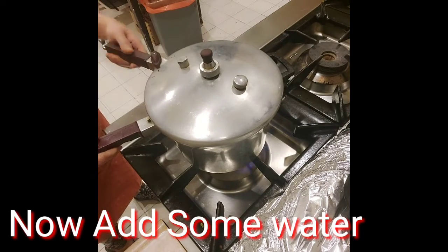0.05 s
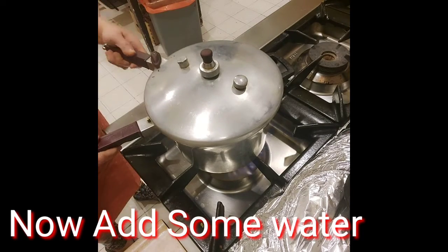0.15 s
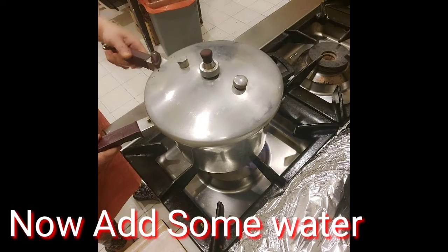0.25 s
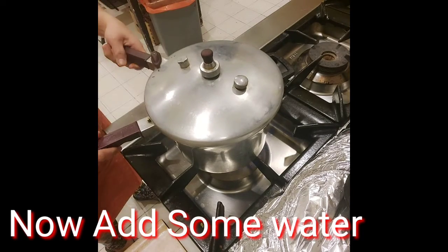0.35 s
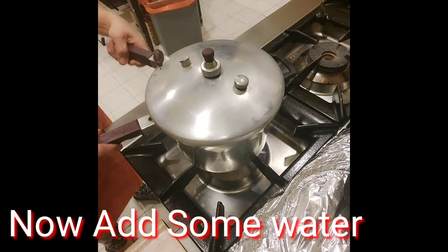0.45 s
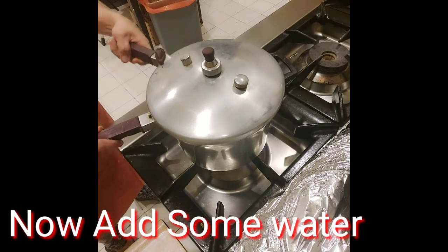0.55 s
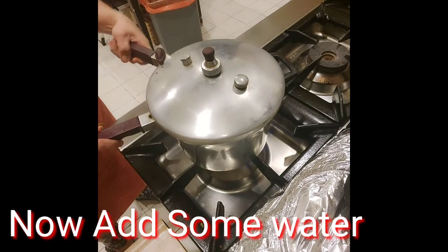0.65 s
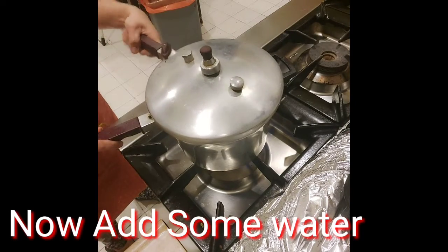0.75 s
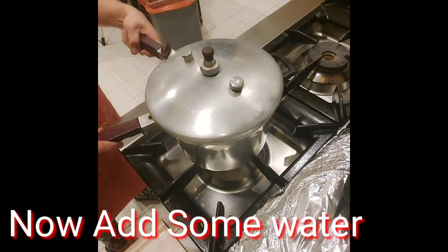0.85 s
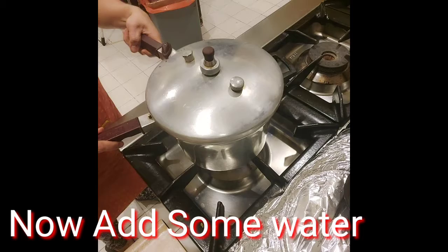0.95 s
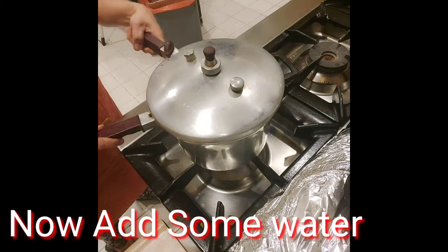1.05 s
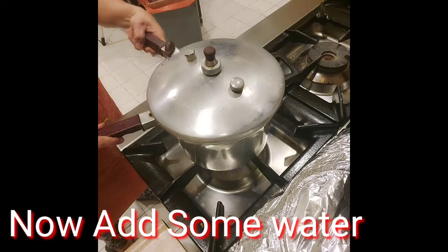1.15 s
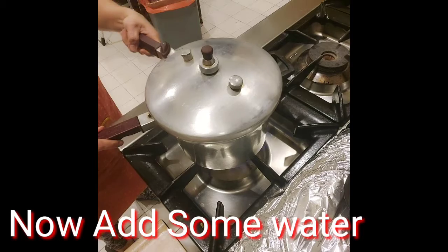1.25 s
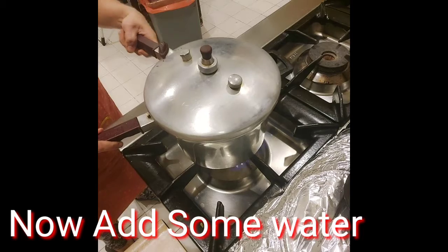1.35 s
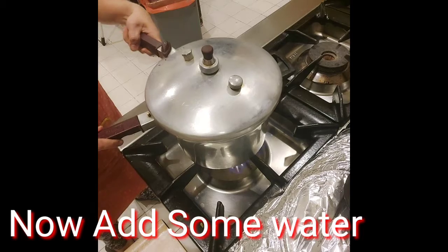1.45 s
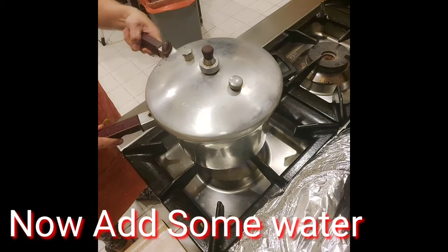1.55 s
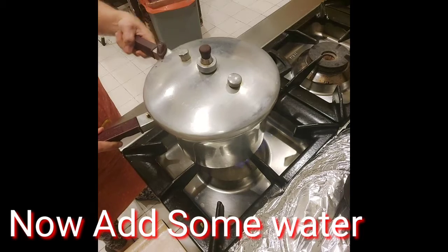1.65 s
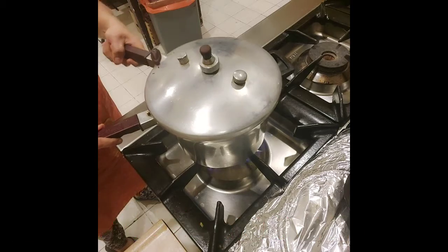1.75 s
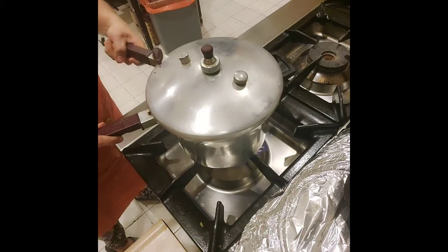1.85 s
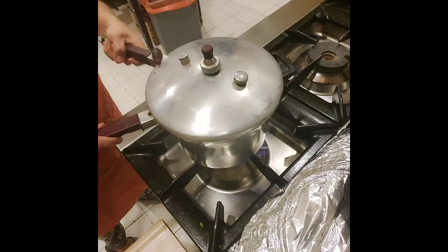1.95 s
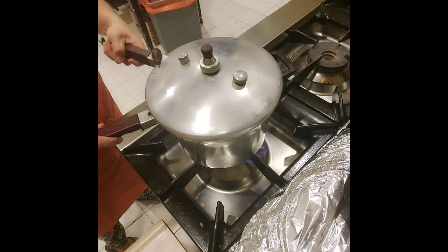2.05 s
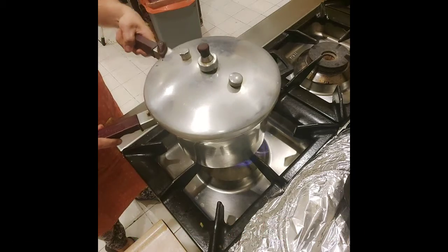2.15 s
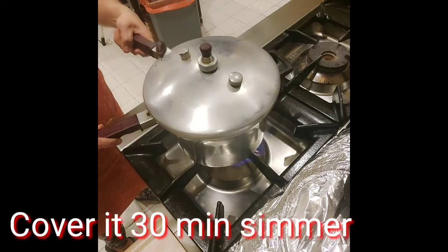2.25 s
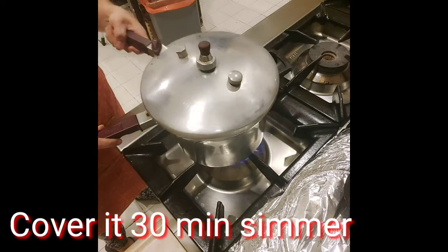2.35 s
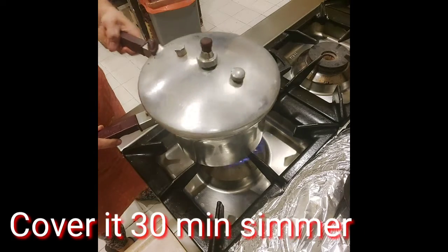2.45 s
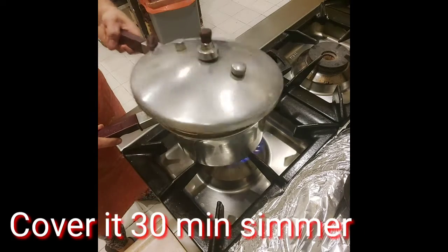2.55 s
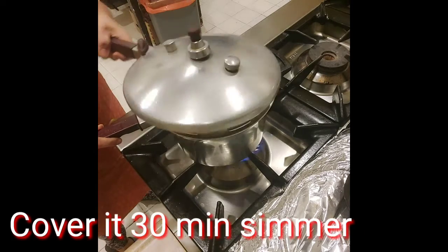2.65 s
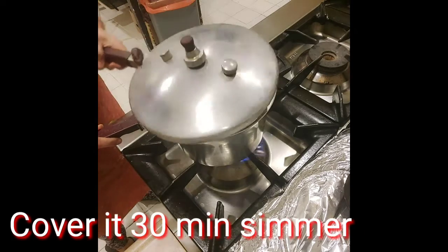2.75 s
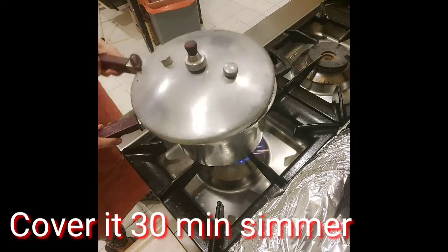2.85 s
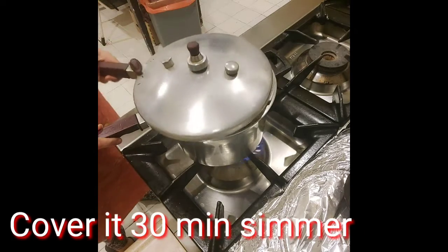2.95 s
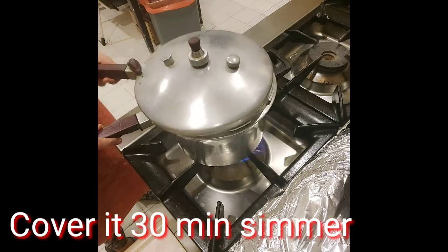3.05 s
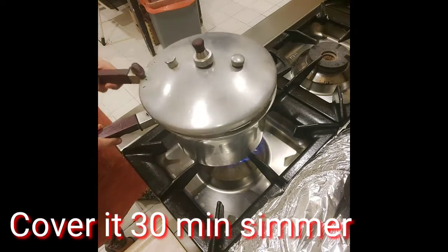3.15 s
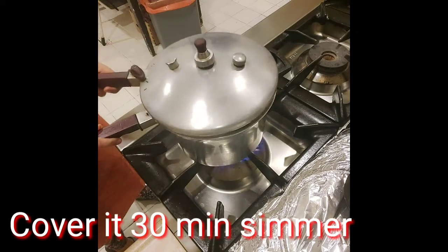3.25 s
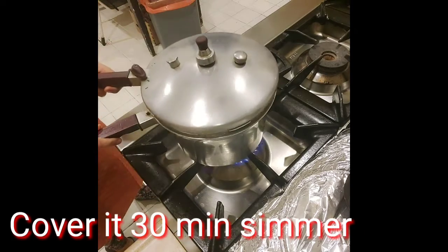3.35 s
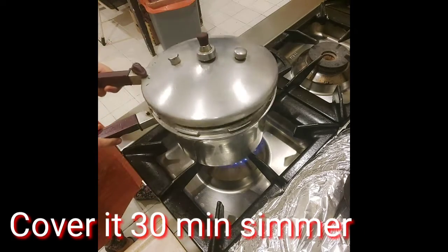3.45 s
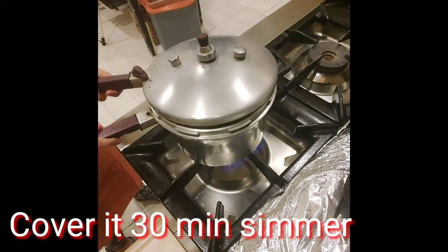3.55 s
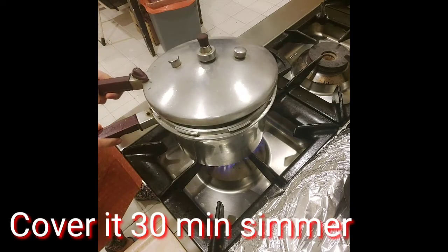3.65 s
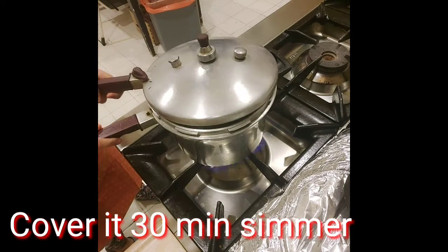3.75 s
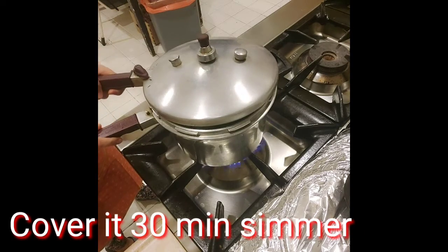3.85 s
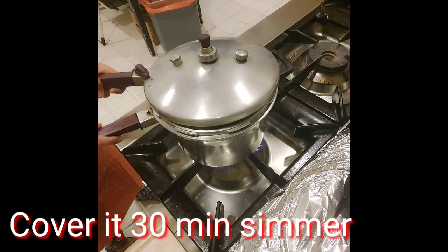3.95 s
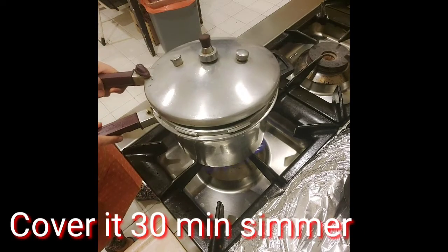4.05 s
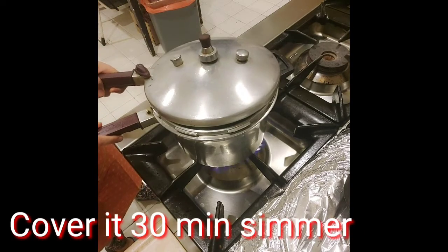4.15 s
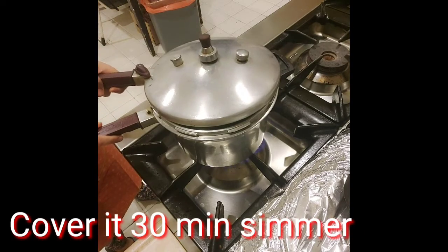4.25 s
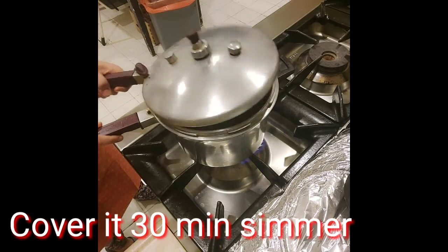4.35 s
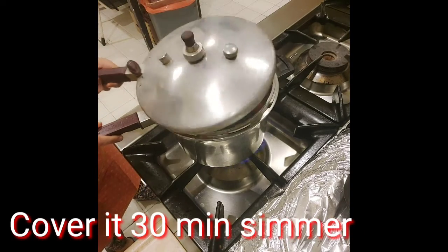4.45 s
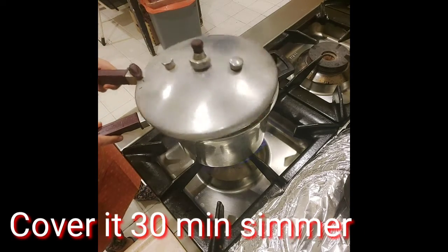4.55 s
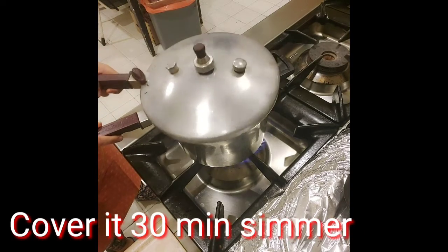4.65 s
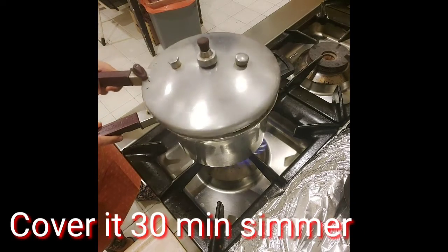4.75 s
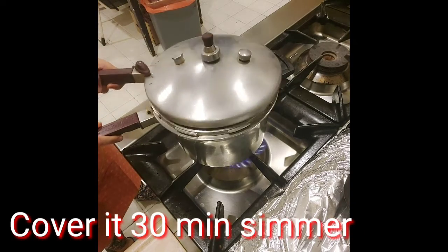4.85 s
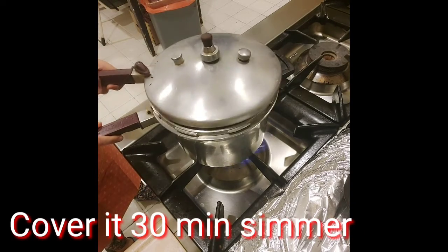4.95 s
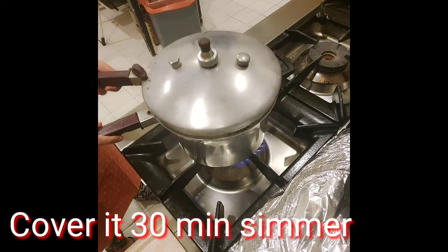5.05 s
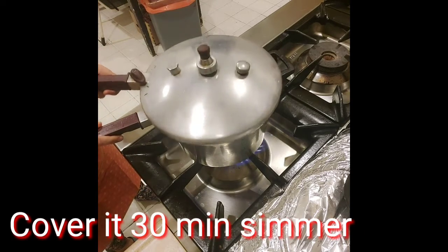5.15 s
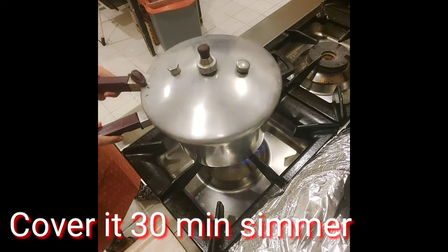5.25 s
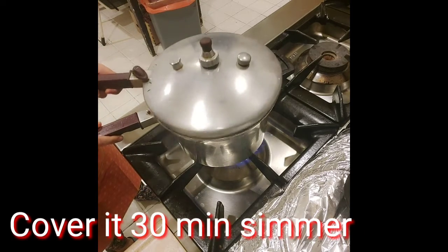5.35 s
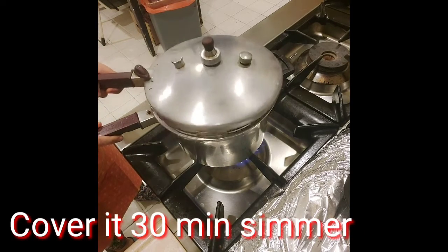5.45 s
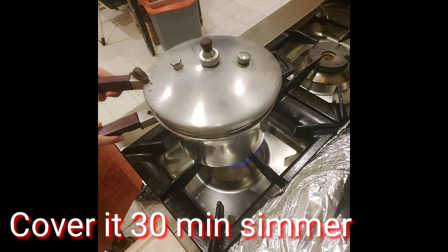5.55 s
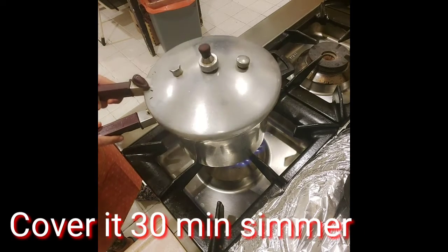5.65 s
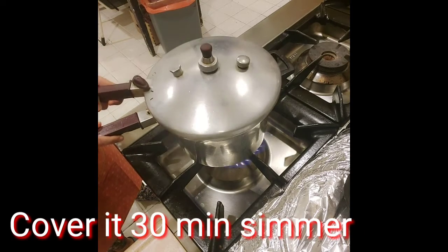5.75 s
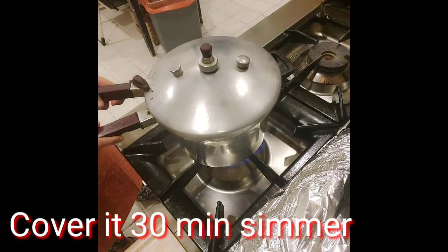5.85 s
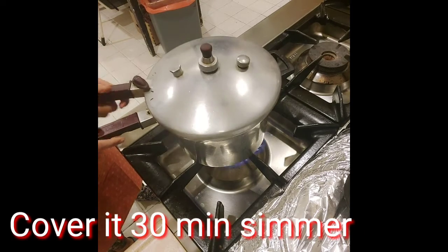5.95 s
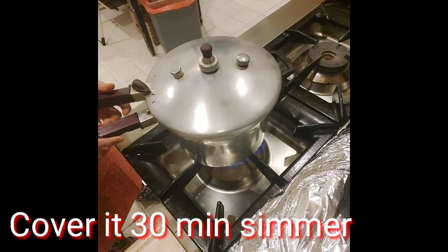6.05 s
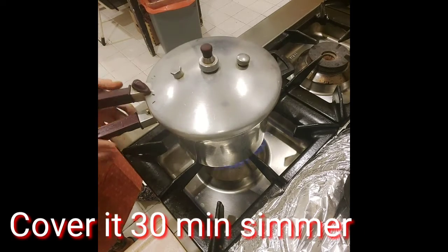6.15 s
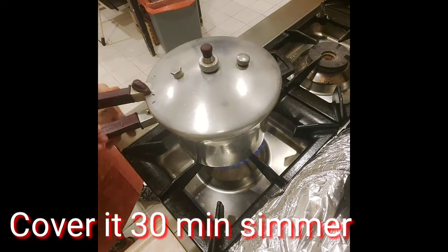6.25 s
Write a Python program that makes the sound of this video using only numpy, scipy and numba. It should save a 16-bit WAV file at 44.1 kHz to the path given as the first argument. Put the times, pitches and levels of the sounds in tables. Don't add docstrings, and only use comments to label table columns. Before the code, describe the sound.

Close stereo sound of a thin metal lid clattering on a heavy pot. One hard clack and short scrape, tiny gasket squeaks, a rapid cluster of clanks with dull thuds, then a rough twist. Longer clattering follows as the lid is lifted and moved, a lull, then drops and uneven knocks until it seats. Low burner roar continues throughout in a small hard-walled kitchen.

```python
import sys
import numpy as np
from scipy import signal
from scipy.fft import rfft, irfft
from scipy.io import wavfile
from scipy.ndimage import uniform_filter1d
from numba import njit

SR = 44100
rng = np.random.default_rng(int(sys.argv[2]) if len(sys.argv) > 2 else 0)


def digitize_waveform(pressure):
    field = np.atleast_2d(pressure).T
    bounded = np.clip(field, -1, 1)
    quanta = np.round(bounded * 32767).astype(np.int16)
    wavfile.write(sys.argv[1], SR, quanta)


def invert_db(x):
    u = np.asarray(x, float) / 20
    return 10 ** u


N = 277830
TIME = np.arange(N) / SR


def curve(table, axis=1):
    return np.interp(TIME, *np.array(table).T[[0, axis]])


def on_log(table, hz):
    table_hz, value = np.array(table).T
    return np.interp(np.log(hz), np.log(table_hz), value)


def band(x, lo_hz, hi_hz):
    edges_hz = [lo_hz, min(hi_hz, .45 * SR)]
    return signal.sosfilt(signal.butter(2, edges_hz, "bandpass", fs=SR, output="sos"), x)


@njit
def ring(x, hz, t60_s):
    y, z = np.empty(len(x), np.complex128), 0j
    for i in range(len(x)):
        z = z * np.exp(2j * np.pi * hz[i] / SR - np.log(1000) / (t60_s * SR)) + x[i]
        y[i] = z
    return y


def steady(hz):
    return np.full(N, 1. * hz)


def walk(rate_hz):
    k = int(SR / rate_hz)
    held = np.repeat(rng.standard_normal(N // k + 1), k)
    return 1.415 * uniform_filter1d(uniform_filter1d(held, k), k)[:N]


def pushes(s, gain):
    x = np.full(N, 1e-18)
    np.add.at(x, (np.asarray(s) * SR).astype(int), gain)
    return x


# (frequency [Hz], level [dB])
FLAME_BANDS = [(15, -56), (25, -5), (54, -4), (158, -6), (219, -39), (243, -18.5), (326, -9), (394, -10),
               (450, -17), (879, -22.5), (978, -20), (1150, -29), (15000, -26)]
# (time [s], rumble [dB])
FLAME_SWELL = [(0.0, -48), (0.49, -48.5), (1.03, -41), (1.44, -44.5), (1.82, -41.5), (1.98, -42.5),
               (2.25, -38.5), (2.9, -47), (3.39, -41.5), (4.33, -46.5), (4.7, -40.5), (5.47, -43.5),
               (5.69, -41.5), (6.3, -45)]


def burner():
    rumble_db = curve(FLAME_SWELL)
    swell_db = rumble_db + 42.5
    roar_db, hiss_db = -46 + 0.75 * swell_db, -59.5 + swell_db
    out, swell = 0, walk(2.08)
    for hz in 31 * 2 ** np.arange(0, 9.1, 1 / 3):
        mid, side = band(rng.standard_normal((2, N)), hz / 1.096, hz * 1.093)
        low, high = np.clip(np.log2([500 / hz, hz / 2000]) / 0.5, 0, 1)
        db = low * (rumble_db + 3) + (1 - low - high) * (roar_db + 10) + high * (hiss_db + 16)
        db = db + on_log(FLAME_BANDS, hz) + .6 * swell + 1.7 * walk(9)
        width = np.clip(hz / 900, .12, .9)
        out = out + invert_db(db) * (mid + width * side * np.array([[1], [-1]]))
    return out * invert_db(21.0)


# (frequency [Hz], t60 [s], level from flame [dB], level from jolts [dB])
ROOM_MODES = [(63.45, 0.76, 2.5, -17.5), (163.1, 0.28, 3.5, -36), (278, 0.26, -6, -14),
              (395, 0.19, -38.5, -56)]


def boom(jolts):
    flame = invert_db(curve(FLAME_SWELL) + 1.0 * walk(1.8))
    out = 0
    for hz, t60_s, flame_db, jolt_db in ROOM_MODES:
        drive = invert_db(flame_db - 36.5) * flame * rng.standard_normal(N) + invert_db(jolt_db - 28.5) * jolts
        out = out + ring(drive, steady(hz), t60_s).imag
    return out


# (time [s], peak [dB], pot air re peak [dB], rim re peak [dB], crack centre [Hz])
NUDGES = [(0.603, -23, -43, -3, 1730), (0.8059, -43, 16, 4, 3380), (0.8325, 0, -8, -3.5, 2435),
          (0.9044, -9.5, -11.5, -13, 2610), (1.0994, -35.5, -26, 1, 2390)]
JIGGLES = [(1.8056, -11.5, -3, -8.5, 2550), (1.8219, -11.5, -36, 0.5, 2720), (1.8289, -8, -14.5, -8, 2330),
           (1.8368, -1, -7.5, -13, 1466), (1.8401, -4.5, -35, -10, 2860), (1.8451, -4.5, -7, -25, 3100),
           (1.8531, -17, -10, -19, 2860), (1.8663, -2.5, -41, -25, 2720), (1.892, -2.5, -39, -22, 3070),
           (2.0973, -15, -35, -5.5, 1490)]
TWISTS = [(2.2665, 0.5, -42, -13.5, 1540), (2.3033, -7.5, -46, -6, 2340), (2.345, -2.5, -48, -32, 2460),
          (2.3964, -26, -21, 3.5, 1580), (2.411, -7.5, -30, -11, 2290), (2.531, -34, 12.5, -3, 2300),
          (2.5452, -21.5, 7, -3, 2290), (2.578, -21, -17, -1.5, 2600)]
LIFTS = [(3.0551, 0, -10, -25, 2680), (3.093, -9, -21, -17, 2840), (3.2139, -5.5, -9, -12.5, 2780),
         (3.2391, 2.5, -16.5, -16, 2680), (3.2479, -4.5, -5.5, -13, 2430), (3.2775, -2, -16, -19.5, 3144),
         (3.3599, -5.5, -3.5, -17, 2880), (3.3882, -8, -14, -7.5, 3040), (3.4107, -29, 10, 2, 3420),
         (3.4488, -26.5, 8.5, -1, 2760), (3.465, -12.5, -13, -7, 2730), (3.4874, -27, 3, -17, 2930),
         (3.63, -20, 2, -5, 1650), (3.6491, -25.5, 11.5, 4.5, 1650), (3.6671, -14, -1, -5, 2090),
         (3.7253, -26, 7, -12, 1800), (3.9084, -35, 11, -1, 1810), (3.935, -36, 11.5, -19, 2580)]
TOUCHES = [(4.4442, -28, 2, -8, 2810), (4.4528, -8.5, -11.5, -10, 2360), (4.466, -20, -8, -11, 1300),
           (4.497, -24.5, -12, -8.5, 1460)]
DROPS = [(4.6796, -0.5, -39, -25, 2330), (4.7469, -5, -6.5, -14, 1890), (4.7516, -2, -13, -31, 1850),
         (4.7549, -4, -6, -27, 3150), (4.764, -9.5, -9.5, -23, 2680), (4.7989, -28, -27, -24, 2980),
         (4.821, -5, -10, -19.5, 2790), (4.835, -16, -5, -23, 2720), (4.883, -19, -3.5, -21, 1760),
         (4.9126, -12.5, -5.5, -15, 2650), (4.9681, -19, -29, -16.5, 2020), (5.0578, -23, -5, -6.5, 2170),
         (5.121, -27.5, -0.5, -9, 1860)]
SEATINGS = [(5.164, -31, 1, -7, 3160), (5.1963, -7.5, -13.5, -19, 2580), (5.218, -6.5, -8, -9, 2710),
            (5.2816, -24.5, 9.5, -1.5, 3200), (5.4417, -11.5, -4.5, -18, 1890),
            (5.45, -6, -30, -15.5, 3520), (5.4734, -12.5, -11, -8, 1980), (5.4956, -2, -17.5, -14, 3340),
            (5.5588, -4, -6, -17, 3090), (5.682, -6.5, -7.5, -7.5, 2760), (5.703, -6.5, -4.5, -8, 3070),
            (5.7615, -15.5, -19, -11, 3290), (5.813, -19.5, -3, -33, 3030), (6.1323, -33, 2, -1.5, 3620)]
VALVE_CLINKS = [(2.6524, -10.5, -43, -34, 2470), (2.69, -46, -21.5, -34, 2600),
                (4.5462, -16.5, -16, -41, 2400)]
MORE_KNOCKS = [(2.428, -28, -30, -20, 3450), (3.352, -15.5, -17, -19, 2030), (3.368, -27, -21, -3, 1480),
               (4.507, -38.5, -4, -4, 1180), (5.459, -18, -11, -14, 2790), (5.486, -10, -5, -20, 3300),
               (5.53, -23, -22, -12, 2400)]
GLANCING_TIMES_S = [.9044, 1.8929, 2.3033, 2.345, 3.094, 3.2393, 3.3593, 3.3884, 4.4522, 4.7545, 4.8345]


def knocks():
    handlings = (NUDGES, JIGGLES, TWISTS, LIFTS, TOUCHES, DROPS, SEATINGS, VALVE_CLINKS, MORE_KNOCKS)
    s, db, air_db, rim_db, hz = np.vstack(handlings).T
    glancing = abs(s[:, None] - np.array(GLANCING_TIMES_S)).min(axis=1) < .003
    return s, db, air_db, rim_db, hz, 0.00395 * glancing


HOLD_FROM_S = [0, .82, .89, 1.8, 1.86, 2.05, 2.26, 2.29, 2.5, 2.64, 3.0, 3.2, 3.27, 3.34, 3.6, 4.4, 4.54,
               4.67, 4.74, 4.81, 5.15, 5.43, 5.49, 5.55, 5.67]


def held(table, s):
    return np.array(table)[np.searchsorted(HOLD_FROM_S, s) - 1].T


# (bright tick [dB], five dome families low to high [dB], lasting ring [dB])
HOLD_RING = [(-43, -14.5, -31, -24, -9.5, -36, -22), (-25, -17, -16, -17, -38, -16, -26.5),
             (-21.5, -11, -27, -15, -36, -14, -35), (-25, -20.5, -36, -19, -18, -23, -23),
             (-28.5, -19, -28, -18, -16, -17.5, -28), (-33, -14.5, -17, -27, -37, -29, -36),
             (-17, -17.5, -19, -20, -16, -22.5, -45), (-29.5, -43, -13.5, -12, -11.5, -9.5, -36),
             (-21.5, -39, -16.5, -15.5, -14, -20, -42.5), (-29, -45.5, -19, -20.5, -20, -6, -34),
             (-34, -10, -54, -23, -24, -19, -45), (-31.5, -19, -23, -18, -23, -16, -39),
             (-27.5, -24.5, -39, -16, -11, -24, -34), (-39, -11, -25, -17, -18, -28, -37),
             (-24, -12.5, -28, -32, -12, -14, -43.5), (-38, -11.5, -29, -16, -22, -12, -43),
             (-27.5, -46, -6, -12, -9, -13, -37), (-28.5, -22.5, -15, -14, -28, -15, -36),
             (-29, -13.5, -17, -18, -14, -20, -36), (-33, -16.5, -24, -16, -15, -22, -34),
             (-28.5, -11, -22, -17.5, -18, -32, -31), (-25, -27, -17, -23, -11, -35, -34),
             (-30, -10, -21, -25, -19, -26, -41), (-27.5, -28, -13, -15, -10, -42, -36),
             (-27, -14, -20, -16.5, -19, -20.5, -33)]


def grip(s):
    tick_db, *family_db = held(HOLD_RING, s)
    return tick_db, family_db


def cracks(s, db, bright_db, rim_db, hz, skid_s):
    out, t = np.zeros((2, N + 8192)), np.arange(8192) / SR
    for at, peak, bright, rim_re, centre, skid in zip(s, db, bright_db, rim_db, hz, skid_s):
        mid, side = rng.standard_normal((2, 3, len(t)))
        noise = mid + 0.62 * side * np.array([1, -1])[:, None, None]
        onset = np.minimum(t / (skid + 1 / SR), 1)

        def fall(fast_s, slow_s, share):
            return (np.exp(-t / (fast_s + skid / 2)) + share * np.exp(-t / slow_s)) * onset

        clumps = np.repeat(invert_db(4 * rng.standard_normal(64)), 128)
        core = band(noise[:, 0] * fall(0.00095, 0.0022, 0.35), centre / 1.063, centre * 0.992)
        wide = band(noise[:, 0] * fall(.0018, .025, .16), centre / 1.7, centre * 1.8)
        tick = band(noise[:, 1] * clumps * fall(0.0031, 0.031, 0.31), 4500, 14500)
        knock = band(noise[:, 2] * fall(0.0037, 0.069, 0.15), 512, 1350)
        snap = band(noise[:, 2] * np.exp(-t / 0.00058), centre / 1.33, centre * 1.57)
        wide += invert_db(-2.5) * snap / abs(snap).max() * (skid == 0)
        burst = invert_db(12.0) * core + invert_db(-1.0) * wide
        burst += invert_db(bright + 12.0) * tick + invert_db(rim_re + 10.0) * knock
        i = int(at * SR)
        out[:, i:i + len(t)] += invert_db(peak) * burst
    return out[:, :N]


def body(modes, touches, db, grit, spread_db, turn, loose=1):
    spot = rng.standard_normal((len(touches), len(modes)))
    out, rattle = np.zeros((2, N)), invert_db(loose * 3.5 * walk(70))
    for k, (hz, mode_db, t60_s) in enumerate(modes):
        blow = invert_db(db + spread_db * spot[:, k])[:, None] * (-1) ** k / touches.shape[1]
        drive = pushes(touches, blow) + grit * rng.standard_normal(N)
        z = ring(drive, hz * (1 + loose * .005 * walk(30)), float(t60_s))
        z = z * np.roll(rattle, 5000 * k)
        side = np.exp(1j * turn * (-1) ** k)
        out += invert_db(mode_db) * np.array([(z * side).imag, (z / side).imag])
    return out


# (frequency [Hz], level [dB], t60 [s])
DOME_MODES = [
    [(1652, 0, 0.013), (1810, 3.5, 0.016)],
    [(2296, -1, 0.059), (2405, -11.5, 0.14)],
    [(2880, -7, 0.077), (2980, -7.5, 0.13), (2920, -15, 0.1)],
    [(3370, -9, 0.063), (3420, -8.5, 0.056), (3375, -23, 0.06)],
    [(3970, -2.5, 0.044)],
    [(2400, -12.5, 0.53), (2920, -29, 0.3), (4080, -30, 0.23)],
]


def dome(touches, db, hz, family_db, grit):
    out = 0
    for family, held_db in zip(DOME_MODES, family_db):
        octaves_off = abs(np.log2(family[0][0] / hz))
        blow_db = held_db + db - 9.5 * octaves_off
        out = out + body(family, touches, blow_db + 8, grit * invert_db(-27), 1.1, .45)
    return out


# (frequency [Hz], level [dB], t60 [s])
FREE_MODES = [
    [(3352, -5, 0.44)],
    [(3396, 0.5, 0.12), (1091.6, -1.5, 0.16), (1176, -8, .1), (1820, -9.5, 0.2), (2880, -11.5, .16)],
]
# (thin ring [dB], family [dB])
HOLD_FREE = [(-50, -54), (-56, -54), (-50, -45), (-50, -50.5), (-50, -44), (-54, -49), (-41, -46),
             (-39.5, -45), (-42, -45), (-48, -47.5), (-41.5, -30.5), (-37, -31), (-34, -31.5), (-35, -36),
             (-30.5, -35), (-32, -49), (-26, -53), (-37, -27), (-44, -27), (-42, -34.5), (-36, -28),
             (-42, -33.5), (-45, -26), (-48, -27), (-45, -30)]


def free_lid(s, touches, db, grit):
    return sum(body(family, touches, db + held_db + 8, grit * invert_db(-36), 1.5, .4, loose=.3)
               for family, held_db in zip(FREE_MODES, held(HOLD_FREE, s)))


# (frequency [Hz], level [dB], t60 [s])
SHELL_MODES = [(1350, -8, .1), (2100, -5, .13), (2590, -6, .1), (2690, -6, .08), (4400, -9, .04)]
# (frequency [Hz], level [dB], t60 [s])
SHEEN_MODES = [(4700, 3.5, 0.05), (5060, 2.5, 0.077), (5920, -6, 0.059), (6950, -13, 0.046),
               (9130, 6, 0.027), (10000, -2.5, 0.029), (12100, -16.5, 0.045), (14100, 1, 0.034)]


def shell(touches, db, bright_db, grit):
    out = body(SHELL_MODES, touches, db - 22.5, grit * invert_db(-28.5), 0.45, 0.075)
    return out + body(SHEEN_MODES, touches, db + bright_db - 0.5, grit * invert_db(-27.5), 5.5, 0.89)


# (time [s], pot air pitch [Hz], rim freedom [dB])
GAP = [
    (0, 408, -35),
    (2.5, 403.4, -20),
    (3.0, 417.7, 13.5),
    (3.6, 403.7, -6),
    (4.7, 413.7, 5.5),
    (5.3, 428, 0),
    (5.55, 388.7, 5),
    (5.7, 314, -4),
    (5.8, 219, -51),
]


def pot_air(s, puff_db, grit):
    puffs = pushes(s, invert_db(puff_db - 6.0)) + grit * invert_db(-35) * rng.standard_normal(N)
    pitch_hz = curve(GAP) * (1 + 0.015 * walk(25))
    return band(ring(uniform_filter1d(puffs, size=30), pitch_hz, 0.14).imag, 250, 1050)


# (frequency [Hz], level [dB], t60 [s])
RIM_MODES = [(614, -12.5, 0.17), (793, -15.5, 0.19), (962, 1.5, 0.03), (1084, -2.5, 0.15),
             (1135.5, 2.5, 0.042)]


def rim(touches, db, grit):
    return body(RIM_MODES, touches, db - 5.5, grit * invert_db(-40.0), 1.0, 0.42) * invert_db(curve(GAP, axis=2))


# (start [s], length [s], level [dB], brightness [dB])
LUG_DRAGS = [(0.9, 0.16, -39.5, -24), (1.094, 0.011, -45.5, 7), (1.253, 0.011, -58.5, 11),
             (1.298, 0.065, -45.5, -2.5), (1.884, 0.16, -35, -15), (2.289, 0.14, -20, -12.5),
             (3.28, 0.19, -34, -38), (3.637, 0.062, -41, -22), (4.719, 0.016, -22, -30),
             (4.85, 0.7, -47, -28), (5.55, 0.065, -29.5, -11), (5.765, 0.027, -33, -4)]


def drag(bright):
    rise_db_s, fall_db_s, rest_db = 373, 241, -87
    db = [peak_db + bright * top_db - rise_db_s * np.maximum(start - TIME, 0)
          - fall_db_s * np.maximum(TIME - start - length, 0)
          for start, length, peak_db, top_db in LUG_DRAGS]
    return np.maximum(np.max(db, axis=0), rest_db - 20 * bright)


def stick_slip():
    return invert_db(2.0 * rng.exponential(size=N) + 0.8 * walk(28.94)) * (rng.random(N) < .03)


def rasp(grains, grit):
    out = band(grit * rng.standard_normal((2, N)), 790, 4500) * invert_db(11.5)
    out += band(grains * invert_db(drag(True)) * rng.standard_normal((2, N)), 5000, 17000) * invert_db(14.0)
    return out + band(grit * rng.standard_normal(N), 200, 1010) * invert_db(14.5)


def lid():
    s, db, air_db, rim_db, hz, skid_s = knocks()
    touches = s[:, None] + skid_s[:, None] * rng.random((len(s), 4))
    tick_db, family_db = grip(s)
    bright_db = tick_db + 0.19 * db
    grains = stick_slip()
    grit = grains * invert_db(drag(False))
    metal = dome(touches, db, hz, family_db, grit) + free_lid(s, touches, db, grit)
    metal += shell(touches, db, bright_db, grit) + rim(touches, db + rim_db, grit)
    air = pot_air(s, db + air_db, grit)
    return metal + air + rasp(grains, grit) + cracks(s, db, bright_db, rim_db, hz, skid_s)


# (frequency [Hz], t60 [s])
KITCHEN_T60 = [(125, 0.76), (500, 0.51), (2000, 0.46), (6000, 0.53), (14000, 0.12)]


def kitchen(x):
    t = np.arange(SR) / SR
    tail = 0
    for hz in 63 * 2 ** np.arange(8):
        mid, side = band(rng.standard_normal((2, SR)), hz / 2.35, hz * 1.31)
        pair = mid + np.clip(hz / 900, .15, 1) * side * np.array([[1], [-1]])
        tail = tail + pair * invert_db(-60 * t / on_log(KITCHEN_T60, hz)) * np.clip(t / 0.0013, 0, 1)
    return signal.fftconvolve(x.mean(axis=0)[None], tail, axes=1)[:, :N]


# (time [s], peak [dB], frequency [Hz], t60 [s])
POT_THUDS = [(1.2, -40.5, 350, 0.24), (0.833, -17, 160, 0.062), (1.832, -21, 276, 0.041),
             (2, -14, 159, 0.051), (1.823, -21, 157, 0.077), (2.2512, -22.5, 244, 0.028),
             (2.58, -22, 643, 0.044), (3.9, -21, 580, 0.038), (5.8, -27, 600, 0.063),
             (6.133, -27, 582, 0.043), (2.266, -18, 187, 0.039), (3.233, -25, 160, 0.12),
             (5.685, -33.5, 208, 0.2), (5.794, -17, 140, 0.038), (0.852, -26, 830, 0.28),
             (2.285, -17.5, 810, 0.12), (2.31, -28, 760, 0.08), (1.828, -20, 950, 0.04)]


def thuds():
    return sum(ring(pushes([s], invert_db(db - 0.5)), steady(hz), t60_s + 0.0061).imag
               for s, db, hz, t60_s in POT_THUDS)


# (time [s], peak [dB], width [ms])
AIR_SLAPS = [
    (.8335, -5, 0.23),
    (1.8064, -21, 0.58),
    (1.826, -14, 0.48),
    (1.8291, -3.5, 0.11),
    (1.8364, -4.5, 0.39),
]


def slaps():
    def bump(s, ms):
        return np.exp(-((TIME - s) / (ms / 1000 + 1 / SR)) ** 2)

    return sum(invert_db(db) * (0.31 * bump(s + 3 * ms / 1000, 2 * ms) - bump(s, ms)) for s, db, ms in AIR_SLAPS)


# (start [s], end [s], level [dB])
GASKET_SQUEAKS = [
    (1.29, 1.42, -60),
    (1.54, 1.63, -61.5),
    (1.715, 1.795, -56),
]
# (frequency [Hz], width [Hz], level [dB])
GASKET_MODES = [(545, 60, 11), (2130, 200, -7), (3550, 500, -3), (5260, 520, 5)]


def squeaks():
    tone = 0
    for hz, width_hz, db in GASKET_MODES:
        mode = ring(rng.standard_normal(N), steady(hz), 6.5 / width_hz).imag
        tone = tone + invert_db(db) * mode / np.sqrt(np.mean(mode ** 2))
    gate = sum(invert_db(db) * np.clip(np.minimum(TIME - start, end - TIME) / 0.004, 0, 1)
               for start, end, db in GASKET_SQUEAKS)
    return tone * gate * invert_db(1.2 * walk(36.2))


# (time [s], peak [dB], frequency [Hz])
SQUARE_STRIKES = [(3.0547, -8, 1750), (3.2136, -8, 2500), (3.2391, -9, 2500), (4.6795, -2.5, 3020),
                  (4.681, -5, 2810), (5.1969, -10, 1800), (5.2181, -14, 2210), (5.4503, -8, 2500),
                  (5.4731, -14.5, 1200), (5.4956, -1.5, 2700), (5.5602, -4.5, 2700)]


def strikes():
    out = 0
    for s, db, hz in SQUARE_STRIKES:
        turn = 4 * hz * (s - TIME)
        out = out + invert_db(db) * turn * np.exp(.5 - turn ** 2 / 2)
    return out


def scene():
    jolts = thuds()
    near = lid() + jolts + slaps() + strikes() + squeaks()
    sound = near + invert_db(-40.5) * kitchen(near) + burner() + boom(jolts)
    sound[0] = np.roll(sound[0], 3)
    return sound * invert_db(np.array([[-1.1], [.9]]))


def band_limit(x):
    return signal.sosfilt(signal.butter(12, 16480, fs=SR, output="sos"), x)


# (frequency [Hz], level [dB])
MIC_RESPONSE = [(30, -17), (100, 5), (1000, -1.5), (3500, -1), (6000, -11.5), (8000, -14), (11000, -10.5),
                (15000, -23.5)]


def record(dry):
    hz = np.maximum(np.fft.rfftfreq(N, 1 / SR), 1)
    x = irfft(rfft(dry, axis=1) * invert_db(on_log(MIC_RESPONSE, hz)), N, axis=1)
    x = .96 * x / (1 + x ** 4) ** .25
    x = signal.sosfilt(signal.ellip(6, .3, 32, 15500, fs=SR, output="sos"), x)
    return band_limit(x)


dry = scene()
out = record(dry)
digitize_waveform(out)
```